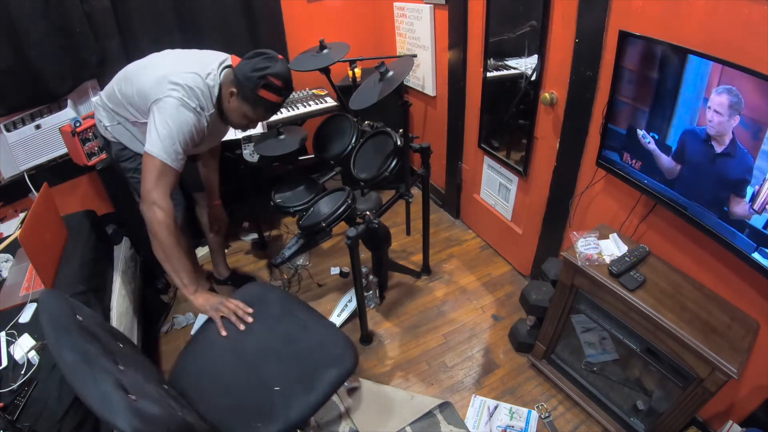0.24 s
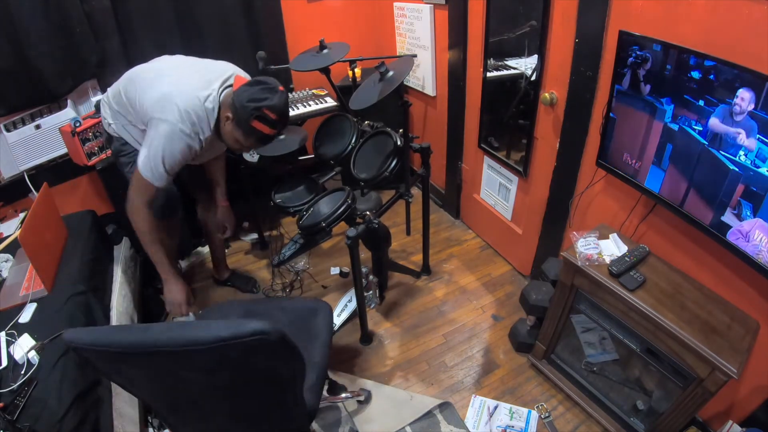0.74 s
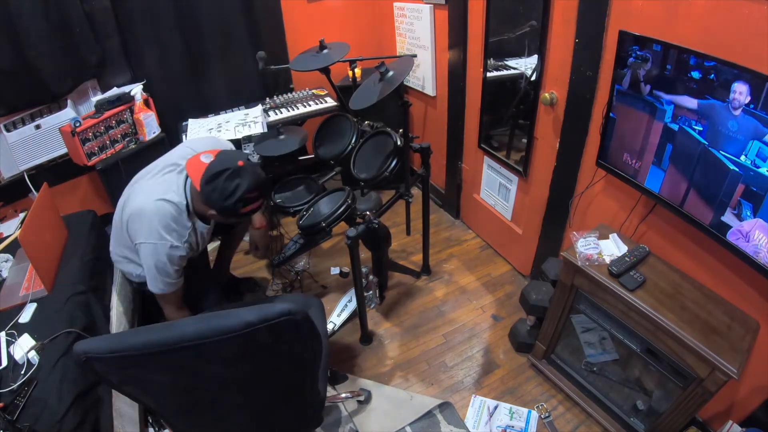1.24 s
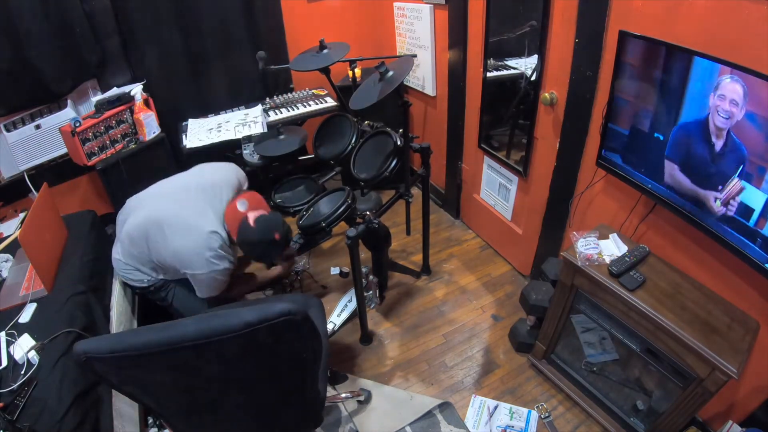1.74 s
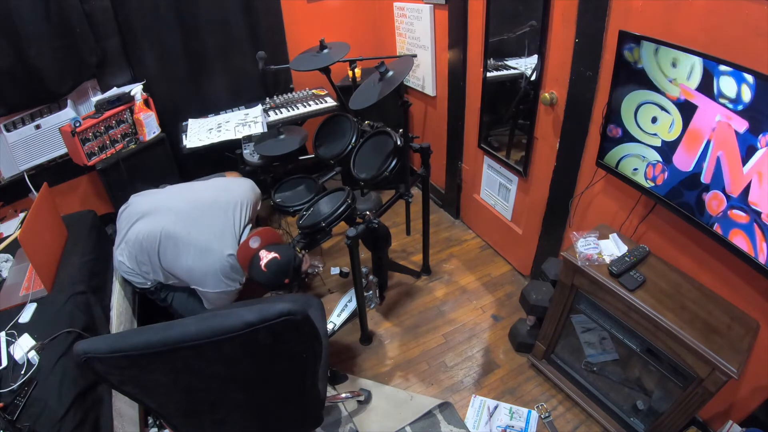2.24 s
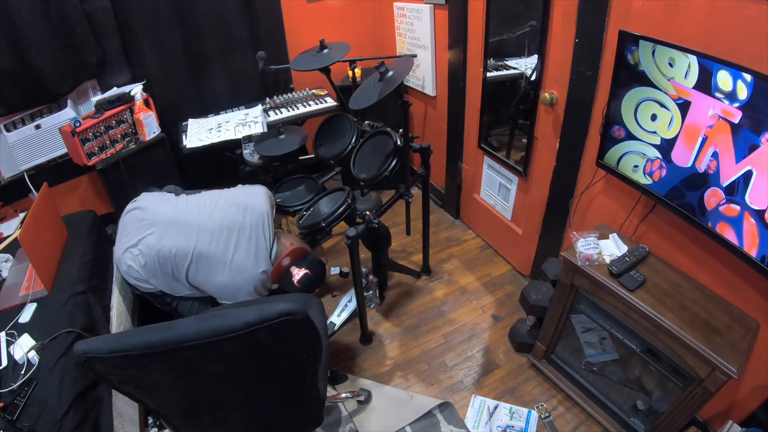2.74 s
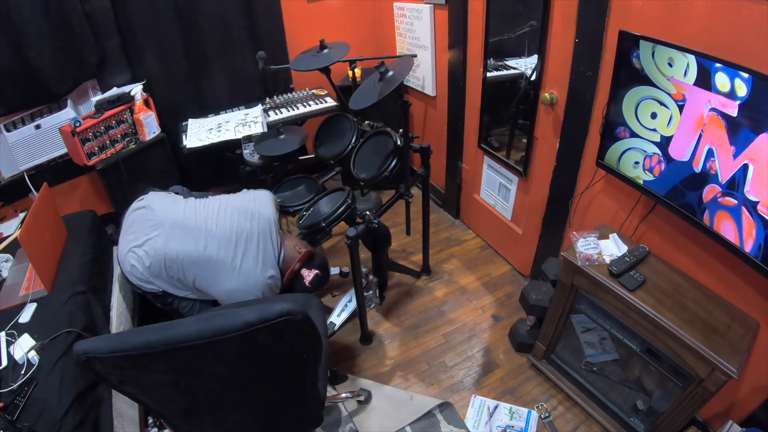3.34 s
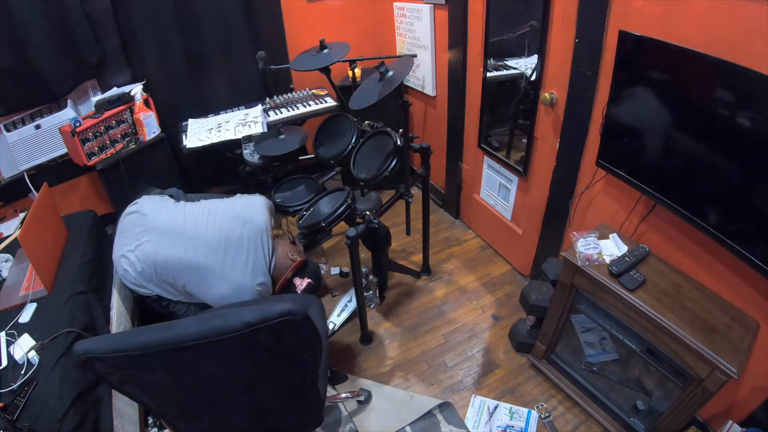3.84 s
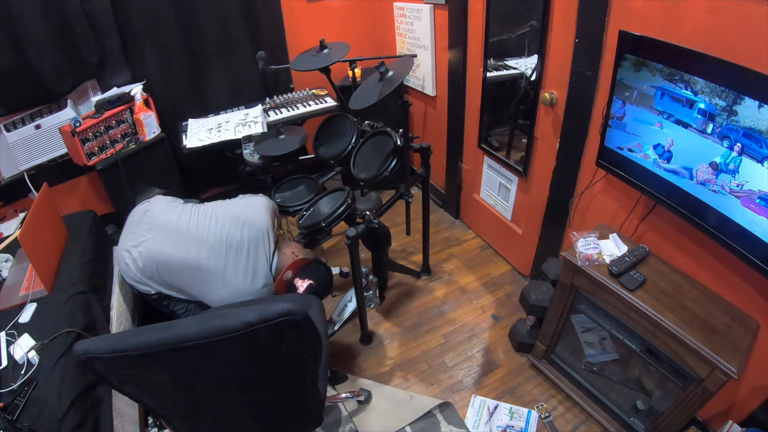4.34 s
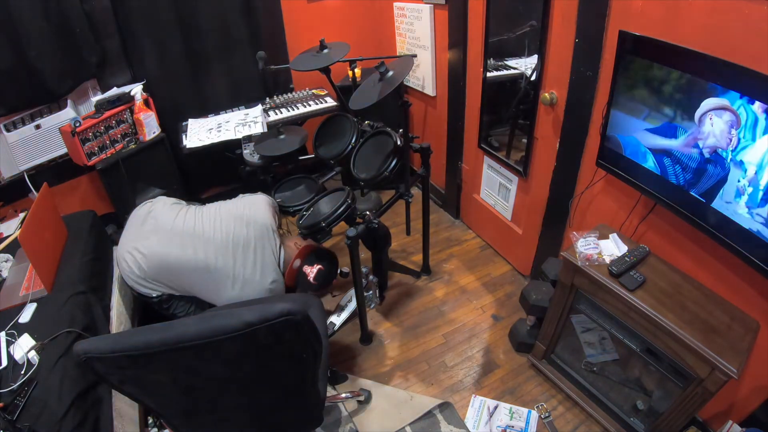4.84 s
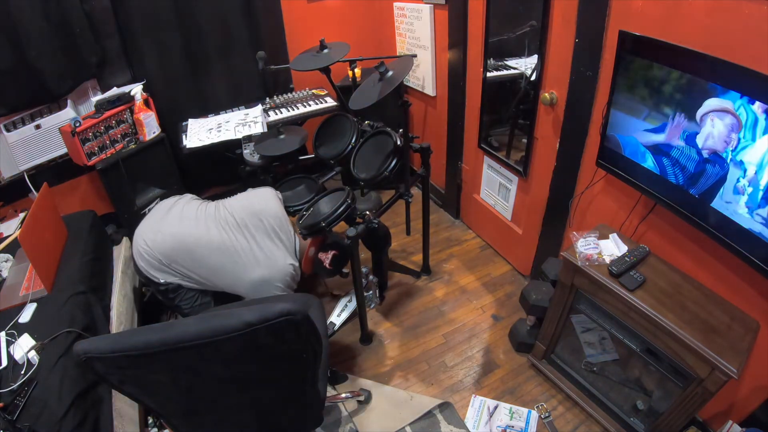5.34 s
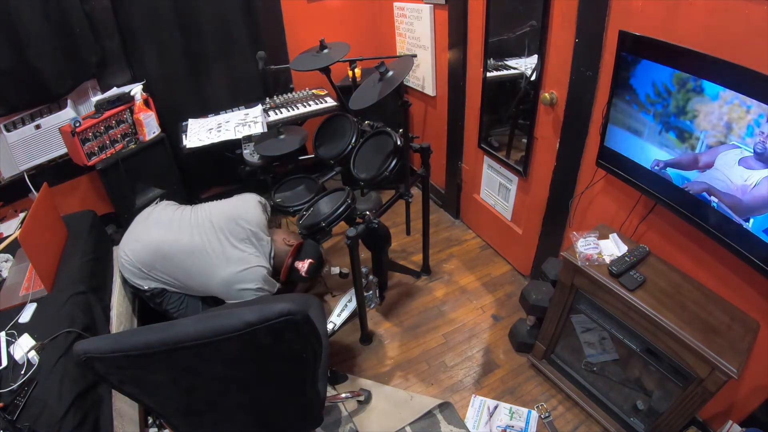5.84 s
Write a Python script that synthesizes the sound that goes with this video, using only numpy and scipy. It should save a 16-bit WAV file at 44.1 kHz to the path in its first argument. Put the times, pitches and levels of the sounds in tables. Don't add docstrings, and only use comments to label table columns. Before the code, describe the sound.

Cloth and cables rub grainily while metal hardware and a hollow shell are knocked about. The first second and a half is loudest, with a ringing clank, fast rattling and low knee thumps on floorboards. Then come sparse light ticks, faint strap slides and near silence, before scattered clicks, a dry knock and a late deep thud. Close, dull small room, slightly distant overhead microphone, faint hiss.

```python
import sys
import numpy as np
from scipy import signal
from scipy.fft import rfft, irfft, next_fast_len
from scipy.io import wavfile

SR = 44100
rng = np.random.default_rng(int(sys.argv[2]) if len(sys.argv) > 2 else 0)


def volts_from_decibels(level):
    exponent = np.asarray(level, float) / 20
    return 10 ** exponent


def store_pcm(level_fs):
    pcm = np.round(np.clip(level_fs, -1, 1) * 32767).astype(np.int16)
    wavfile.write(sys.argv[1], SR, np.atleast_2d(pcm).T)


N = 269010

# f/Hz, likeness (1 same, 0 unrelated, negative out of step)
LIKENESS = [(40, 0.28), (300, 0.49), (900, 0.67), (2500, 0.28), (6000, 0.79), (10000, 0.45), (15000, 0.062)]
# f/Hz, level/dB
LEAN = [(60, 1), (110, 5.5), (200, -3.5), (380, 0.0), (700, -2), (1290, -1.5), (2380, 2), (4400, 3),
        (8120, -6.5), (15000, -14.5)]

# t/s, hold/s, rustle level/dB, sheen above rustle/dB, heavy rub above rustle/dB
STROKES = [(0, 0.11, -53.5, -3.5, 1), (0.177, 0.25, -52, 0.5, 5.5), (0.418, 0.016, -44, -1.5, -12),
           (0.548, 0.02, -52, -1, 1.5), (0.697, 0.095, -76.5, 4, -5), (0.914, 0.1, -60, 1, -24),
           (1.139, 0.32, -71.5, 8.5, -24.5), (1.363, 0.011, -60, 3.5, -3.5), (1.374, 0.26, -64.5, -0.5, 1),
           (1.765, 0.27, -72.5, 2.5, 3), (2.014, 0.044, -64, 8.5, 5), (2.117, 0.021, -49.5, 1.5, -4.5),
           (2.187, 0.24, -61, 4.5, 1), (2.626, 0.13, -56.5, -0.5, -9), (2.94, 0.046, -73, -3.5, -14),
           (3.097, 0.18, -77, 4, -7), (3.266, 0.021, -70, 0, -12), (3.4, 0.28, -81, -1.5, -1),
           (3.924, .05, -79, 5, 3), (4.054, 0.011, -58.5, 4.5, 0), (4.17, 0.28, -64, -9, -27),
           (4.575, .07, -67.5, -27, -2), (4.671, 0.21, -65.5, 4.5, -24), (4.973, 0.053, -72.5, 13, -9),
           (5.068, 0.0093, -58, 0.5, -2), (5.222, 0.12, -67.5, -3, -8), (5.42, .03, -76, 1, -6),
           (5.49, 0.3, -64, -1.5, -7), (5.963, 0.095, -80, 3, -4.5)]
# t/s, hold/s, hollow drag level/dB, board rumble level/dB
DRAGS = [(0, 0.26, -55, -59), (.3, 0.13, -47.5, -71), (.42, 0.14, -62, -58), (.9, 0.1, -53, -60.5),
         (1.13, 0.25, -79.5, -69), (1.34, 0.013, -54, -72.5), (1.5, 0.15, -63, -73),
         (1.73, 0.19, -74.5, -86.5), (1.99, 0.0066, -54.5, -74), (2.12, 0.27, -68, -80),
         (2.79, 0.0083, -58.5, -70.5), (2.9, 0.49, -77.5, -93.5), (3.88, 0.13, -67.5, -90),
         (4.1, 0.032, -73, -74), (4.25, 0.26, -65.5, -102), (4.7, 0.46, -68.5, -99),
         (5.083, 0.0027, -56.5, -65.5), (5.24, 0.16, -64.5, -77), (5.45, 0.085, -70, -61.5),
         (5.55, 0.3, -65.5, -82.5)]
# f/Hz, level/dB per Hz
RUSTLE_COLOUR = [(350, -37.5), (600, -5), (1060, -3.5), (1150, -8), (1250, -3), (1980, -2), (2540, -1.5),
                 (4800, -6), (6240, -15.5), (10600, -120)]
# f/Hz, level/dB per Hz
SHEEN_COLOUR = [(2590, -5), (4400, -4), (5640, -4), (6870, -4), (8260, -3), (11800, -5.5), (15600, -13.5)]
# f/Hz, level/dB per Hz
HOLLOW_COLOUR = [(200, -58.5), (258, 3), (334, 7.5), (507, -2), (553, -4), (595, -12.5), (1000, -17),
                 (1300, -43), (2200, -120)]
# f/Hz, level/dB per Hz
RUMBLE_COLOUR = [(22, -11.5), (45, -7), (70, -7), (120, -16), (200, -45.5)]

# f/Hz, level/dB per Hz
HUSH_COLOUR = [(80, -46), (120, -9), (155, -10.5), (246, -1.5), (434, -5.5), (1000, -15), (1560, -5.5),
               (2300, -16.5), (2900, -17.5), (4260, -22), (4730, -20), (7200, -30.5), (8800, -21.5),
               (9900, -13.5), (10800, -20), (13300, -15), (14300, -29), (15500, -34.5)]
# f/Hz, likeness
HUSH_LIKENESS = [(60, 0.4), (290, -0.5), (800, -0.7), (1500, -0.83), (2300, -0.8), (3500, -0.48),
                 (6800, 0.4), (10000, -.1), (15000, -.1)]
HUSH_EDGES = [250, 600, 1200, 2000, 3400, 6500, 8500, 11000, 15000]

# t/s, peak level/dB, ring f/Hz, sheen level/dB, decay/s
SCUFFS = [(.012, -40, 3500, 12.5, 0.076), (.1, -37, 1153, 0.5, 0.3), (.178, -41.5, 5550, 10.5, 0.096),
          (.225, -42, 3700, 1, 0.13), (.788, -33, 3940, -2, 0.19), (1.358, -35, 1393, -2.5, 0.33),
          (1.404, -29, 4530, -2.5, 0.11), (1.615, -52.5, 2900, 9.5, 0.18), (1.905, -46, 3360, -6, 0.3),
          (1.95, -47.5, 604, -3.5, .2), (2.245, -49, 2910, 4, 0.075), (3.275, -50, 2334, -6, 0.085),
          (4.2, -42, 4460, -4, .21), (4.8, -44, 3860, -7, 0.3), (4.992, -50.5, 1454, 2, 0.087),
          (5.305, -40.5, 1296, -4, 0.12), (5.347, -41.5, 2330, -6.5, 0.087)]
# t/s, peak level/dB, ring f/Hz, sheen level/dB, decay/s
KNOCKS = [(.364, -22, 5550, 7.5, 0.12), (.645, -34.5, 1196, -6, 0.095), (.818, -26, 2100, -11, 0.13),
          (1.157, -33, 1330, -22, 0.078), (1.188, -35.5, 880, -15, 0.087), (1.421, -34, 3000, -1.5, .05),
          (1.437, -33, 1000, -6.5, .06), (1.266, -41.5, 1490, -9, 0.074), (1.743, -53.5, 2470, -3, 0.19),
          (2.058, -46, 1600, 9, 0.18), (2.167, -35, 1113, 0, .14), (2.332, -50, 4640, 7.5, 0.23),
          (2.405, -51, 800, -8, 0.052), (2.772, -46, 1336, -6.5, 0.053), (2.908, -60, 2300, -8, .06),
          (2.97, -64, 2500, -5, 0.063), (3.008, -61, 1100, -17, .06), (3.098, -64, 1300, 0, .06),
          (3.85, -50.5, 1300, -1.5, 0.085), (4.134, -49.5, 3300, 0, 0.1), (4.245, -36.5, 2530, -9.5, .14),
          (4.859, -37.5, 4290, -12, 0.11), (5.05, -29.5, 1082, -15, 0.09), (5.678, -37, 2420, -11.5, 0.14),
          (5.781, -40, 2700, -1.5, 0.13), (5.808, -42.5, 1690, 3.5, 0.092), (5.895, -46.5, 3500, -13, 0.13)]

# t/s, peak level/dB, f/Hz, decay/s, scatter (share 0-1)
TAPS = [(.026, -30.5, 322, 0.081, 0.62), (0.253, -40.5, 410, 0.11, 0.76), (.366, -21.5, 535, 0.13, 0.67),
        (.802, -35, 400, 0.052, 0.53), (.822, -33, 485, 0.086, 0.6), (.843, -40.5, 426, .06, 0.74),
        (1.155, -35.5, 411, 0.22, 0.78), (1.265, -43.5, 397, 0.073, 1.1), (2.662, -48.5, 360, 0.035, 0.2),
        (2.688, -42, 346, 0.16, 0.72), (2.769, -41, 323, 0.099, 0.6), (4.108, -50.5, 398, 0.1, 0.38),
        (4.447, -44.5, 339, 0.067, 0.48), (4.47, -51, 340, 0.093, .5), (3.005, -55.5, 330, .07, .5),
        (3.097, -58, 330, .07, .5), (4.868, -42, 407, 0.12, 0.2), (5.047, -34.5, 407, 0.099, 0.63),
        (5.676, -41, 377, 0.092, 0.54)]
# t/s, peak level/dB, f/Hz, decay/s, rise/s
PUSHES = [(.344, -32, 345, 0.13, 0.023), (.805, -29.5, 340.7, 0.12, 0.024), (.906, -34.5, 354, 0.2, 0.018),
          (1.419, -32, 402, 0.2, 0.0035), (1.919, -46.5, 423.6, 0.14, 0.047),
          (2.167, -40, 308.5, 0.19, 0.017), (2.63, -49, 427, 0.18, 0.024), (3.26, -46.5, 399, 0.12, 0.034),
          (4.849, -35.5, 368.6, 0.13, 0.0075), (5.31, -36.5, 466, 0.094, 0.036),
          (5.707, -44.5, 424.5, 0.12, 0.011), (5.895, -44, 308, 0.061, 0.014)]
# t/s, peak level/dB, f/Hz, decay/s, rise/s
NOTES = [(0.37, -25, 871, 0.06, 0.0021), (0.36, -31, 5680, 0.075, .0063), (.97, -38, 301, 0.12, 0.016),
         (1.395, -20.5, 345, 0.096, 0.01), (1.422, -26.5, 820, 0.022, 0.0018),
         (1.42, -43, 4600, 0.08, 0.015), (1.452, -45, 4600, 0.061, .005), (1.46, -37, 290, 0.08, 0.0078),
         (1.455, -41, 752, 0.069, 0.0063), (4.252, -48, 334.3, 0.24, 0.013), (5.71, -47, 430, 0.15, 0.012)]
# f/Hz, level/dB per Hz
THUD_COLOUR = [(120, -25), (200, -28.5), (255, -0.5), (360, 4), (558, -3), (763, -8.5), (858, -9.5),
               (1300, -15), (1690, -28), (2860, -120)]

# t/s, peak level/dB, f/Hz, decay/s, rise/s
PINGS = [(.026, -45, 3330, 0.076, .004), (0.135, -46, 1162, 0.21, 0.015), (.196, -39, 6920, 0.066, 0.0036),
         (.364, -27.5, 2110, 0.097, 0.0027), (.645, -45.5, 1274, 0.11, .004),
         (0.645, -42.5, 3460, 0.094, 0.0027), (0.645, -42, 4340, 0.053, .001),
         (.66, -53.5, 3800, 0.18, 0.0078), (.79, -57, 3720, 0.044, 0.0048), (.804, -40, 3520, .04, .002),
         (.804, -45, 1550, .03, .002), (.819, -30, 3700, 0.056, .002), (.825, -34, 2070, 0.15, 0.0019),
         (0.825, -32, 4500, 0.12, 0.0009), (.826, -35.5, 2540, 0.074, .002),
         (0.83, -35.5, 5600, 0.13, .002), (2.056, -55, 1580, .07, .004), (2.063, -46, 3330, 0.045, .003),
         (2.082, -52, 1850, 0.077, 0.0049), (2.095, -49, 3380, 0.044, 0.0033),
         (2.115, -54, 1590, .06, .006), (2.169, -47.5, 4700, .04, .003), (2.178, -48, 3100, 0.036, .002),
         (2.21, -48, 1000, 0.036, 0.0026), (2.262, -51, 2680, 0.11, 0.0075),
         (2.272, -51, 3020, 0.068, 0.0045), (2.335, -44.5, 5900, .03, 0.0011),
         (3.849, -63, 1480, 0.066, 0.0014), (4.213, -56, 4570, .08, .003),
         (4.247, -42.5, 3500, 0.09, 0.0011), (4.25, -51, 1420, 0.13, 0.0026),
         (4.319, -54, 2480, 0.11, .004), (4.819, -51.5, 2480, .07, 0.0072), (4.832, -56, 1660, .05, .005),
         (4.861, -45, 4420, .05, .001), (4.851, -56, 815, 0.066, 0.0026), (3.849, -63.5, 700, .05, .001),
         (5.052, -44, 2830, .05, 0.0011), (5.062, -42.5, 1980, 0.059, 0.0039),
         (.03, -49.5, 900, 0.064, .006), (.13, -50, 850, 0.21, .015), (4.875, -50, 820, .07, .008),
         (5.215, -63, 600, .08, .01), (5.555, -61, 1540, .06, .006)]

# t/s, peak level/dB, f/Hz, decay/s, rise/s
THUMPS = [(.155, -41, 52, 0.17, 0.035), (.25, -53, 55, 0.11, .015), (.385, -25.5, 53.8, 0.18, 0.0015),
          (.51, -39.5, 48.5, 0.23, 0.018), (1.003, -21, 45, 0.13, 0.014), (1.096, -41, 46, 0.11, 0.017),
          (1.17, -47, 40, 0.12, 0.012), (1.374, -26, 48.3, 0.24, 0.016), (1.47, -39, 46.6, 0.076, 0.0044),
          (1.62, -59, 49.7, 0.11, .02), (1.73, -60, 45, 0.11, 0.018), (2.125, -49, 47.3, 0.1, 0.0035),
          (2.77, -58, 71.6, .087, .0041), (3.29, -31, 58, 0.11, 0.0095), (5.112, -38.5, 41.3, 0.12, 0.02),
          (5.351, -21, 40, 0.14, 0.017), (5.45, -41, 48, 0.24, .012), (5.55, -61, 50, .1, .01),
          (5.79, -57, 50, 0.09, .01)]
# t/s, peak level/dB, f/Hz, decay/s, rise/s
JOISTS = [(.372, -25, 160.5, 0.19, 0.016), (.83, -50.5, 168, 0.074, 0.02), (1.004, -27, 134, 0.11, 0.006),
          (1.27, -51, 168.5, 0.1, 0.019), (1.378, -33, 163, 0.19, 0.012), (1.96, -52.5, 171, 0.12, 0.018),
          (2.169, -37.5, 189.5, 0.15, .0075), (2.2, -48.5, 130, 0.085, 0.0088),
          (2.705, -46, 177.6, 0.076, 0.02), (3.25, -51.5, 158, 0.095, 0.0085),
          (3.29, -36, 151.4, 0.12, 0.0091), (3.335, -49.5, 118.7, .12, .008), (5.0, -46, 164, 0.051, 0.016),
          (5.35, -34.5, 153.5, 0.12, 0.0063), (5.7, -43, 178, 0.11, 0.013), (5.895, -50, 164, 0.081, 0.005)]

# t/s, peak level/dB, f/Hz struck hardest
CHATTER = [(.363, -21, 3650), (.367, -24, 3700), (.372, -19, 3520), (.381, -24, 3450), (.393, -29, 3460),
           (.407, -35, 3600), (.417, -36.5, 3600), (.428, -28, 3550), (.439, -29, 3700), (.445, -41, 3750),
           (.453, -31, 3500), (0.459, -30, 4000), (.465, -35, 3950), (.474, -35, 4000), (.483, -44, 4020),
           (.491, -51, 4000), (.502, -57, 3900)]
CLIP_MODES = [(3255, 0.5), (3500, 0.5), (3611, 0.5), (3722, 3), (3860, -0.5), (4085, 1), (4300, 1.5),
              (9230, 12.5), (9600, -4)]

# t/s, hold/s, level/dB
SLIDES = [
    (2.9, .1, -81),
    (3.36, .08, -77),
    (3.98, 0.28, -71.5),
    (4.28, 0.2, -66.5),
    (4.57, .25, -71.5),
    (5.2, 0.089, -74.5),
    (5.5, 0.11, -77),
]
# f/Hz, width/Hz, level/dB
TUBE = [(1565, 160, 2), (2550, 180, 1), (3500, 400, -9), (4470, 150, -11)]

# f/Hz, width/Hz, lift (share of the input; negative cancels)
HOUSING = [(220, 140, -0.89), (1640, 190, 0.19), (2640, 67, 0.021), (4680, 38.8, -0.44)]


def at_hz(points, hz):
    known_hz, value = np.array(points)[:, 0], np.array(points)[:, 1]
    return np.interp(np.log(hz), np.log(known_hz), value)


def drift(rate_hz):
    r = np.exp(-2 * np.pi * rate_hz / SR)
    slow = signal.lfilter([1], [1, -2 * r, r * r], rng.standard_normal(N + SR))[SR:]
    return slow / slow.std()


def noise(colour, grain_db=0, likeness_drop=0, likeness=LIKENESS):
    size = next_fast_len(N)
    white = rng.standard_normal((2, size))
    grain = np.minimum(rng.exponential(1, size), 5)
    white = white * volts_from_decibels(grain_db * grain)
    hz = np.maximum(np.arange(size // 2 + 1) * SR / size, 1)
    alike = np.clip(at_hz(likeness, hz) - likeness_drop, -.95, 1)
    mid, side = rfft(white) * np.sqrt([1 + alike, 1 - alike])
    octaves_below = np.maximum(0, np.log2(colour[0][0] / hz))
    octaves_above = np.maximum(0, np.log2(hz / colour[-1][0]))
    colour_db = at_hz(colour, hz) - 40 * (octaves_below + octaves_above)
    lean_db = at_hz(LEAN, hz) / 4
    pair = np.array([(mid + side) * volts_from_decibels(lean_db), (mid - side) * volts_from_decibels(-lean_db)])
    out = irfft(pair * volts_from_decibels(colour_db), size)[:, :N]
    return out / out.std()


def gestures(table, rise_db_per_s, fall_db_per_s):
    start, hold, *levels_db = np.transpose(table)
    t = np.arange(0, N + 64, 64) / SR
    early = np.maximum(start[:, None] - t, 0)
    late = np.maximum(t - (start + hold)[:, None], 0)
    shape = volts_from_decibels(-rise_db_per_s * early - fall_db_per_s * late)
    gains = [np.sqrt(volts_from_decibels(2 * db) @ shape ** 2) for db in levels_db]
    return [np.interp(np.arange(N) / SR, t, gain) for gain in gains]


def strike(decay, rise, fall_off=1.38):
    t = np.arange(round((rise + decay) * SR)) / SR
    onset = np.sin(np.pi / 2 * np.minimum(t / rise, 1)) ** 2
    tail = volts_from_decibels(-60 * (np.maximum(t - rise, 0) / decay) ** fall_off)
    return t, onset * tail


def add(out, sound, s):
    at = round(s * SR)
    out[:, at:at + sound.shape[1]] += sound[:, :N - at]


def two_pole(hz, width_hz):
    r = np.exp(-np.pi * width_hz / SR)
    return [1, -2 * r * np.cos(2 * np.pi * hz / SR), r * r], r


def resonate(x, hz, width_hz):
    y = signal.lfilter([1, 0, -1], two_pole(hz, width_hz)[0], x)
    return y * x.std() / y.std()


def rubbing():
    strokes = [(s, hold, db, db + sheen_db, db + weight_db) for s, hold, db, sheen_db, weight_db in STROKES]
    slip, gloss, press = gestures(strokes, rise_db_per_s=153.5, fall_db_per_s=182)
    drag, _ = gestures(DRAGS, rise_db_per_s=144.5, fall_db_per_s=163.5)
    _, shake = gestures(DRAGS, rise_db_per_s=299, fall_db_per_s=298)
    clumps, fibres = drift(36), noise(RUSTLE_COLOUR, grain_db=4.0)
    heavy = signal.sosfilt(signal.butter(2, 1300, fs=SR, output="sos"), fibres)
    light = signal.sosfilt(signal.butter(4, 1200, "high", fs=SR, output="sos"), fibres)
    rustle = volts_from_decibels(0.57 * clumps) * (press * heavy + slip * volts_from_decibels(1.5 * drift(6.4)) * light)
    sheen = gloss * volts_from_decibels(0.34 * clumps + 3.38 * drift(11.3)) * noise(SHEEN_COLOUR, grain_db=1.5)
    hollow = (drag + volts_from_decibels(-74.5)) * volts_from_decibels(2.7 * drift(23)) * noise(HOLLOW_COLOUR)
    rumble = (shake + volts_from_decibels(-82)) * volts_from_decibels(2 * drift(10)) * noise(RUMBLE_COLOUR)
    return rustle + sheen + hollow + rumble


def resting_hush(level_db, flutter_db):
    return volts_from_decibels(level_db + flutter_db * drift(4)) * noise(HUSH_COLOUR, likeness=HUSH_LIKENESS)


def patchy(hush, sway_db):
    out = hush.copy()
    for low, high in zip(HUSH_EDGES, HUSH_EDGES[1:]):
        band = signal.lfilter(*signal.butter(1, [low, high], "band", fs=SR), hush)
        out += (volts_from_decibels(sway_db * drift(2.7)) - 1) * band
    return out


def contacts(table, rise_share, longest_rise, grain_db, ring_share, sharpness, crack, rattle_db, spread):
    out, rattle = np.zeros((2, N)), volts_from_decibels(rattle_db * drift(50))
    body = rattle * noise(RUSTLE_COLOUR, grain_db, spread)
    sheen = rattle * noise(SHEEN_COLOUR, grain_db, spread)
    for s, peak_db, hz, sheen_db, decay in table:
        t, envelope = strike(decay, min(rise_share * decay, longest_rise))
        at = min(round(s * SR), N - len(t))
        now = slice(at, at + len(t))
        small = signal.butter(2, 0.36 * hz, "high", fs=SR)
        burst = signal.lfilter(*small, body[:, now]) * envelope * (1 + crack * np.exp(-t / 0.0029))
        ring = resonate(burst, hz, hz / sharpness)
        gloss = volts_from_decibels(sheen_db) * sheen[:, now] * envelope ** 0.91 * (1 - np.exp(-t / 0.002))
        add(out, volts_from_decibels(peak_db - 11.0) * (burst + ring_share * ring + gloss), s)
    return out


def shell():
    tap_rise_s, push_scatter, note_scatter = .006, 0.56, 0.22
    out, thud = np.zeros((2, N)), noise(THUD_COLOUR, likeness_drop=-0.23)
    blows = [(*tap, tap_rise_s, scatter) for *tap, scatter in TAPS]
    blows += [(*push, push_scatter) for push in PUSHES]
    blows += [(*note, note_scatter) for note in NOTES]
    for s, peak_db, hz, decay, rise, scatter in blows:
        t, envelope = strike(decay, rise)
        at, scatter = min(round(s * SR), N - len(t)), np.clip(scatter, 0, 1)
        note = (1 - scatter) * np.sin(2 * np.pi * hz * t + np.array([[.2], [-.2]]))
        rough = 0.66 * scatter * thud[:, at:at + len(t)]
        add(out, volts_from_decibels(peak_db) * envelope * (note + rough), s)
    return out


def pings(sharpness, steady):
    out, white = np.zeros((2, N)), rng.standard_normal((2, N))
    for s, peak_db, hz, decay, rise in PINGS:
        t, envelope = strike(decay, rise, fall_off=0.92)
        at = round(s * SR)
        mid, side = resonate(white[:, at - 1000:at + len(t)], hz, hz / sharpness)[:, 1000:]
        note = steady * np.sin(2 * np.pi * hz * t) + (1 - steady) * mid / mid.std()
        width = 0.23 * side / side.std() * np.array([[1], [-1]])
        add(out, volts_from_decibels(peak_db) * envelope * (note + width), s)
    return out


def boards(blows, partner, partner_db, sag, scatter, fall_off):
    out, shudder = np.zeros((2, N)), noise(RUMBLE_COLOUR[:1] + [(400, -15)])
    for s, peak_db, hz, decay, rise in blows:
        pan_db = 3.0 * np.log2(hz / 45) * np.array([[.5], [-.5]])
        t, envelope = strike(decay, rise, fall_off)
        cycles = hz * (t + sag * 0.0057 * (1 - np.exp(-t / 0.023)))
        main = np.sin(2 * np.pi * cycles + np.array([[.15], [-.15]]))
        second = np.sin(2 * np.pi * partner * cycles + np.array([[.6], [-.6]]))
        swing = main + volts_from_decibels(partner_db) * np.exp(-t / 0.16) * second
        at = round(s * SR)
        band = signal.butter(2, [0.61 * hz, 1.58 * hz], "band", fs=SR, output="sos")
        near = signal.sosfilt(band, shudder[:, at - 4096:at + len(t)])[:, 4096:]
        blow = (1 - scatter) * swing + scatter * near / near.std()
        add(out, volts_from_decibels(peak_db - 3.0 + pan_db) * envelope * blow, s)
    return out


def chatter():
    out, (mode_hz, mode_db) = np.zeros((2, N)), np.transpose(CLIP_MODES)
    luck = rng.standard_normal((len(CHATTER), 2, len(mode_hz)))
    t, envelope = strike(0.036, 0.00087, fall_off=0.92)
    lag = mode_hz / 9000
    for (s, peak_db, hz), (strength, phase) in zip(CHATTER, luck):
        reach_db = -np.minimum(((mode_hz - hz) / 150) ** 2, 14)
        gains = volts_from_decibels(peak_db - 7.0 + mode_db + reach_db + 2.0 * strength)
        angle = 2 * np.pi * np.outer(t, mode_hz) + phase
        add(out, envelope * np.array([np.sin(angle + lag) @ gains, np.sin(angle - lag) @ gains]), s)
    return out


def sliding():
    level, = gestures(SLIDES, rise_db_per_s=200, fall_db_per_s=300)
    mid, side = rng.standard_normal((2, N))
    rub = mid + 1.1 * side * np.array([[1], [-1]])
    tube = sum(volts_from_decibels(db) * resonate(rub, hz, width_hz) for hz, width_hz, db in TUBE)
    return level * tube / tube.std()


def near_walls(x, echo_db):
    out, lags = x.copy(), rng.uniform(.001, .016, 12)
    for k, lag in enumerate(lags):
        add(out, (-1) ** k * volts_from_decibels(echo_db - 1100 * lag) * x, lag)
    return out * x.std() / out.std()


def room(x):
    t60_s, level_db, dull_hz = 0.21, -18, 5000
    t = np.arange(SR // 2) / SR
    tail = rng.standard_normal((2, len(t))) * volts_from_decibels(-60 * t / t60_s) * np.minimum(t / 0.0079, 1)
    tail = signal.lfilter(*signal.butter(1, dull_hz, fs=SR), tail)
    tail = tail / np.sqrt(np.sum(tail[0] ** 2))
    return volts_from_decibels(level_db) * signal.fftconvolve(x, tail, axes=1)[:, :N]


def housing(sound):
    heard = sound.copy()
    for hz, width_hz, lift in HOUSING:
        feedback, r = two_pole(hz, width_hz)
        heard += lift * signal.lfilter([(1 - r * r) / 2, 0, (r * r - 1) / 2], feedback, sound)
    return heard


def scene():
    knocks = contacts(KNOCKS, rise_share=1, longest_rise=0.00088, grain_db=-3.5, ring_share=0.41,
                      sharpness=24.0, crack=0.31, rattle_db=1.33, spread=-0.12)
    scuffs = contacts(SCUFFS, rise_share=0.19, longest_rise=0.031, grain_db=3.0, ring_share=0.44,
                      sharpness=46.0, crack=0, rattle_db=1.0, spread=-0.083)
    hush = resting_hush(level_db=-67, flutter_db=1.3)
    airborne = near_walls(rubbing() + knocks + scuffs, echo_db=-11)
    struck = shell() + chatter()
    thumps = boards(THUMPS, partner=1.482, partner_db=-3.5, sag=0.55, scatter=0.11, fall_off=1.44)
    joists = boards(JOISTS, partner=1.9, partner_db=-9.0, sag=0.34, scatter=0.47, fall_off=1.24)
    struck = struck + pings(sharpness=10.6, steady=0.31)
    heard = housing(airborne + struck + room(knocks + struck) + patchy(hush, sway_db=2.2) + sliding())
    return heard + thumps + joists


def low_pass(x):
    return signal.sosfilt(signal.butter(12, 15780, fs=SR, output="sos"), x)


def record(dry):
    return low_pass(dry)


dry = scene()
out = record(dry)
store_pcm(out)
```